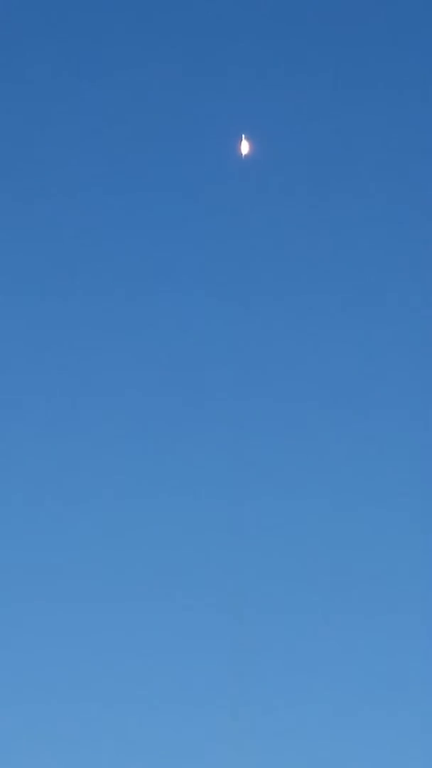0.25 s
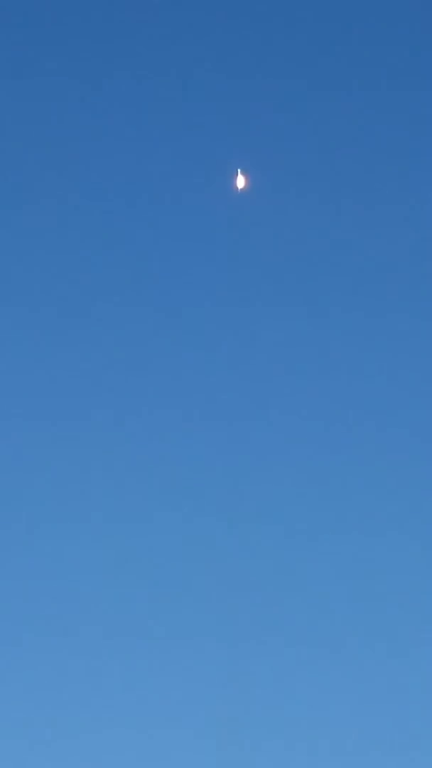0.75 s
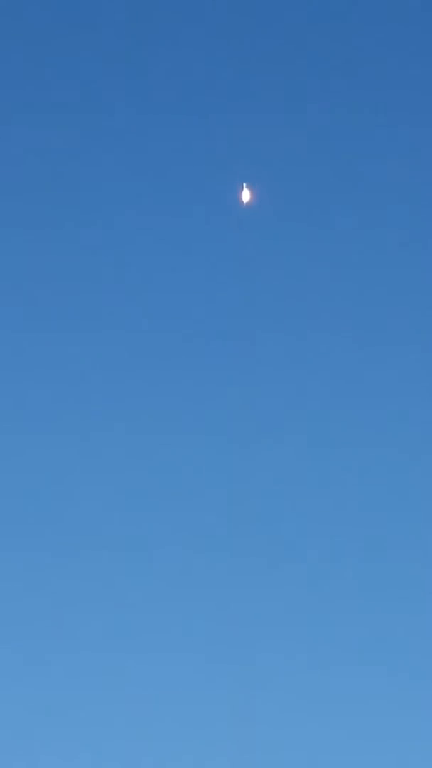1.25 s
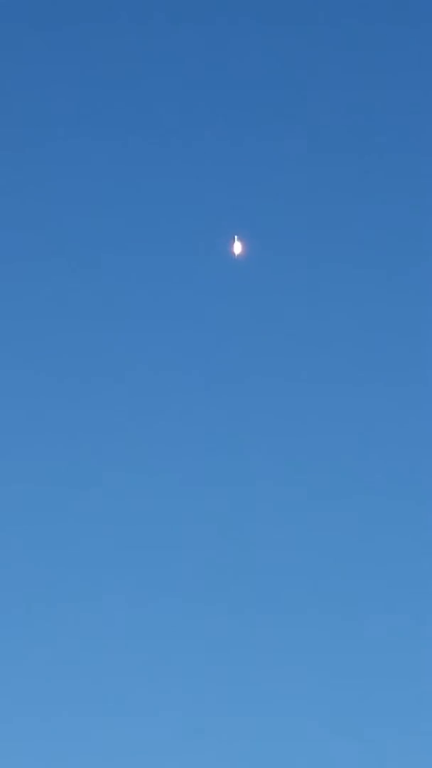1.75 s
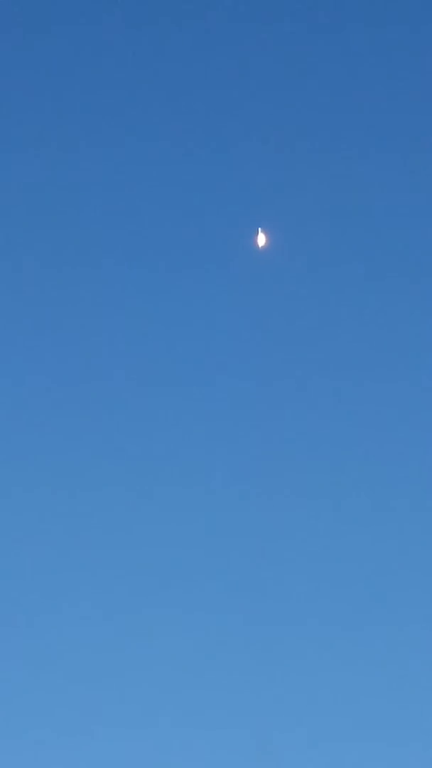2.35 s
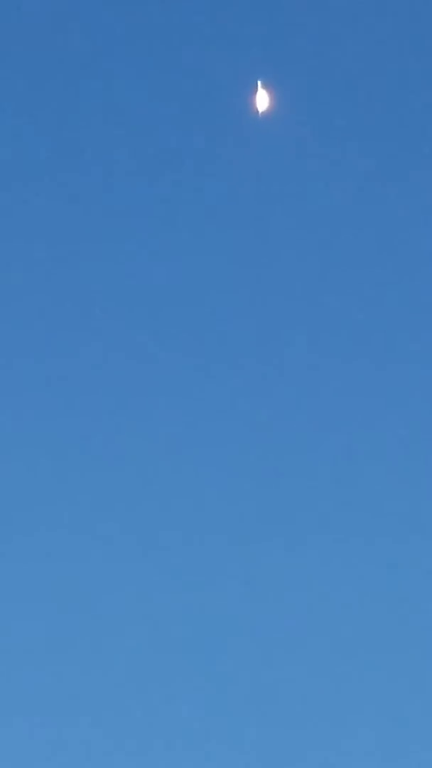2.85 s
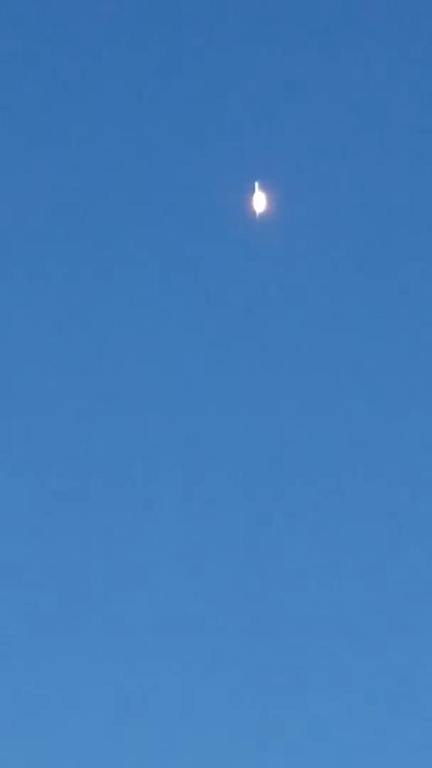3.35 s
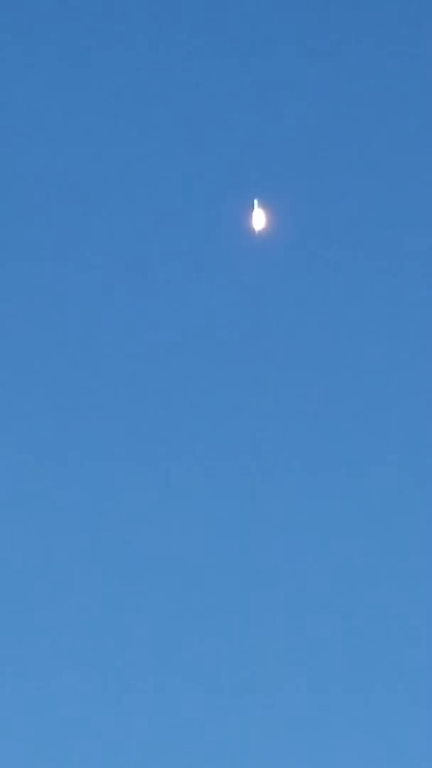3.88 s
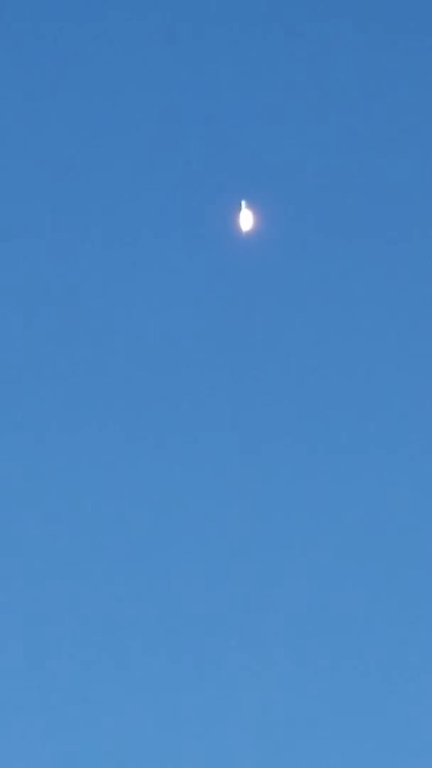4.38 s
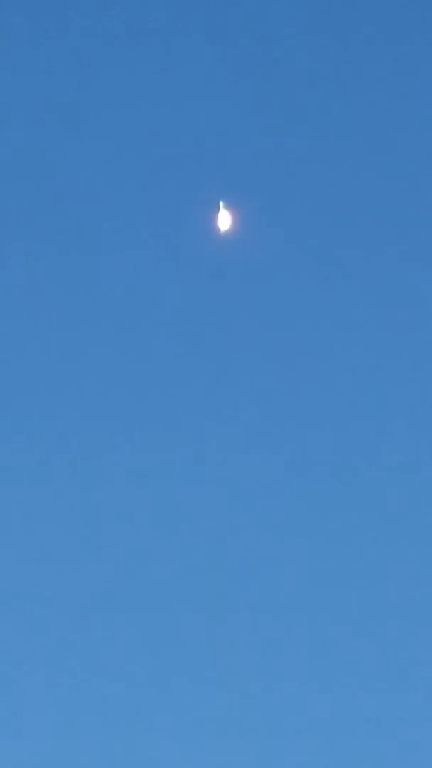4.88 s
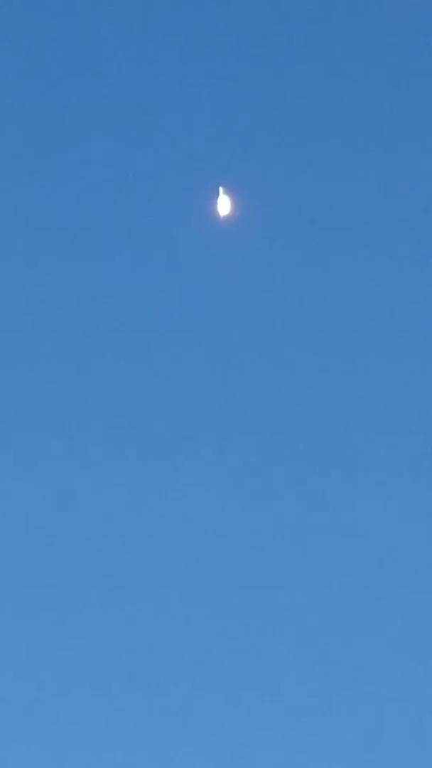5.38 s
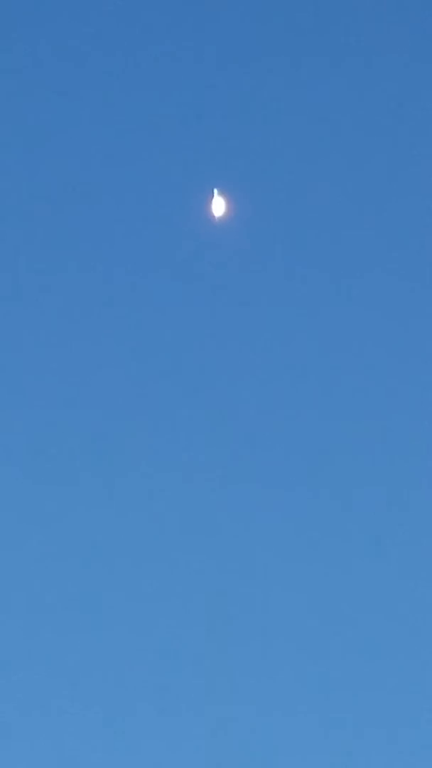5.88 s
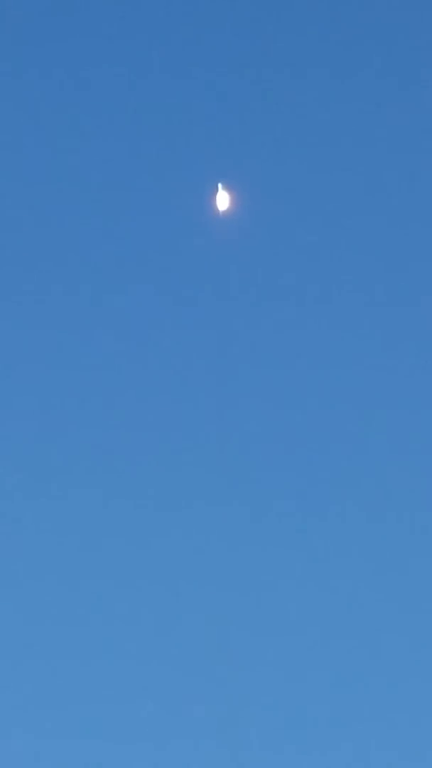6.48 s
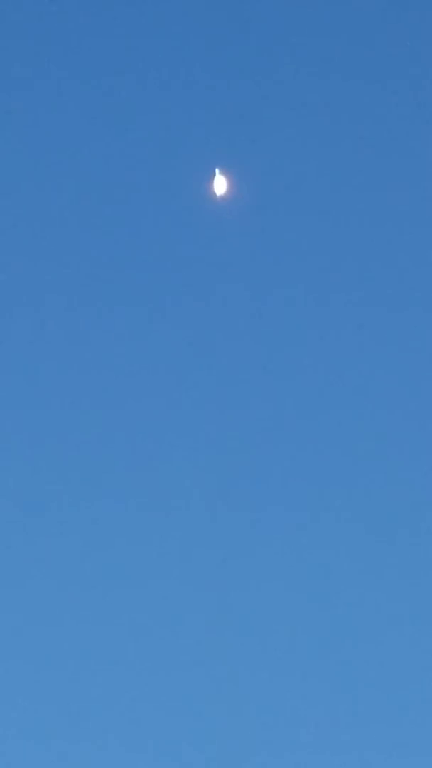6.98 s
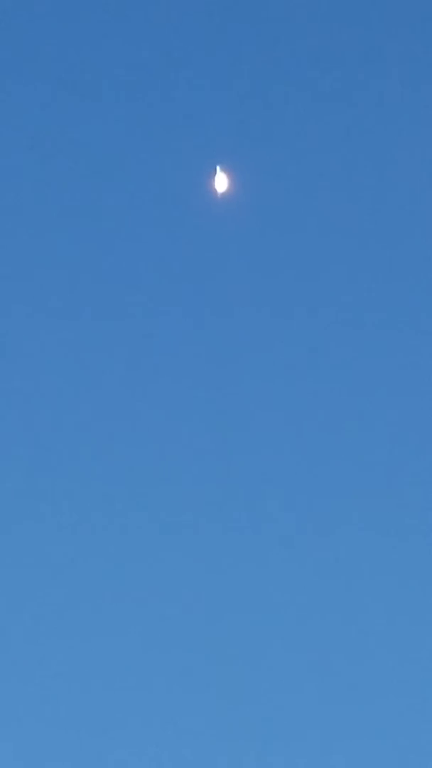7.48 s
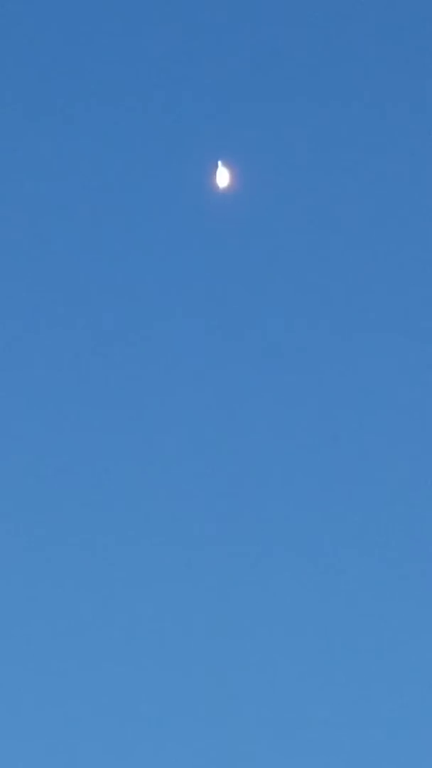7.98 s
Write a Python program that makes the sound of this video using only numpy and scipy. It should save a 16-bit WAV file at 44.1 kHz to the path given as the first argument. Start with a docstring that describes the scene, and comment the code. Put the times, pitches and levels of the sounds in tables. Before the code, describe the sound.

A rocket climbs far away in open air, already thundering from the start. Irregular, hard-edged cracks come many times a second over a dull throbbing roar and deep rumble. The crackle thickens and grows heaviest around four seconds, eases near five and a half, then swells again, duller and weightier. A handheld stereo recorder on the ground is pushed to its ceiling by the strongest cracks.

```python
"""A ragged crackle over a dull throbbing roar and faint hiss: a rocket climbing far overhead.
Its exhaust noise has steepened into shock fronts; each comes again off the ground and is scattered around.
Fronts are pressure jumps shaped by air loss and echo paths; roar and hiss are filtered, flickering noise.
Two microphone ports hear it a little apart, and the strongest fronts reach the recorder's ceiling."""
import sys
import numpy as np
from scipy import signal
from scipy.fft import rfft, irfft, next_fast_len
from scipy.io import wavfile
from scipy.ndimage import uniform_filter1d, minimum_filter1d, map_coordinates

SR = 44100
rng = np.random.default_rng(int(sys.argv[2]) if len(sys.argv) > 2 else 0)


def pcm_store(signal):
    """Save signal as 16-bit PCM."""
    levels = np.round(np.clip(np.atleast_2d(signal), -1, 1) * 32767)
    wavfile.write(sys.argv[1], SR, levels.astype(np.int16).T)


N = 363384

# Strong shock fronts. Each row: time in seconds, peak in dB ahead of the paths and FRONT_DB,
# air loss at 3 kHz in dB over LEAST_LOSS_DB.
STRONG_FRONTS = [(0.007, -7, 0.5), (0.029, -4, 33), (0.042, -4, 19.5), (0.0878, -10, 28), (0.122, -4.5, 14),
                 (0.1482, -6.5, 26), (0.1593, -1.5, 45), (0.1944, -1.5, 6.5), (0.2551, -3.5, 9.5),
                 (0.264, -6, 17), (0.344, 3.5, 0), (0.4062, -6.5, 24), (0.4489, -6.5, 31),
                 (0.494, -6, 10.5), (0.526, -3.5, 27), (0.557, -6, 9.5), (0.584, -2, 6.5),
                 (0.6129, -6.5, 19), (0.625, -7.5, 24.5), (0.656, -4.5, 30), (0.717, -4.5, 16.5),
                 (0.735, -6, 24), (0.761, -7, 19.5), (0.7919, -7.5, 19.5), (0.809, -7, 16.5),
                 (0.818, -10, 16), (0.8579, -4, 7), (0.8731, -5.5, 10.5), (0.888, -10, 15.5),
                 (0.937, -6, 30.5), (0.98, -5, 12.5), (1.028, -6.5, 27), (1.0705, -4.5, 23),
                 (1.096, -3, 31.5), (1.1549, -8, 31.5), (1.1588, -2.5, 27.5), (1.1863, -2.5, 13.5),
                 (1.2266, -2, 5.5), (1.2871, -4, 31), (1.297, -8, 20.5), (1.3069, -0.5, 4),
                 (1.3597, -5.5, 10.5), (1.3704, -4.5, 13.5), (1.4175, -0.5, 4), (1.434, -11, 13),
                 (1.4709, -4, 8.5), (1.5118, -3, 23), (1.5332, -5, 20.5), (1.5712, -1.5, 5),
                 (1.6016, -5, 15), (1.644, -2, 10.5), (1.687, 1.5, 0.5), (1.7056, -13.5, 6),
                 (1.726, -5, 6.5), (1.763, -4, 21.5), (1.783, -4.5, -1), (1.83, -6, 36.5), (1.875, -3, 5),
                 (1.918, -11, 33), (1.9452, -7, 15), (1.9829, -6.5, 31.5), (2.0226, -6, 10),
                 (2.079, -5.5, 10), (2.144, -5, 6), (2.174, -6.5, 12), (2.2447, -6, 25), (2.2889, -6.5, 25),
                 (2.3235, -3.5, 19.5), (2.3568, -4, 16.5), (2.4296, -3, 31.5), (2.485, -4.5, 9.5),
                 (2.558, -4, 19.5), (2.6047, -1, 7.5), (2.6785, -3.5, 18), (2.7, -6, 25),
                 (2.721, -7.5, 18.5), (2.754, -4.5, 55.5), (2.7764, -6, 22), (2.7823, -1.5, 25.5),
                 (2.82, -4.5, 35), (2.8376, -3.5, 7.5), (2.9, -5.5, 28), (2.9288, 3.5, 8),
                 (2.962, -6.5, 12.5), (2.9807, -4.5, 27.5), (3.014, -4.5, 34), (3.049, -1, 18.5),
                 (3.0842, -4.5, 32), (3.1135, -1, 21.5), (3.15, -4.5, 30.5), (3.1813, -4, 26.5),
                 (3.189, -6, 29), (3.2076, 3.5, 13), (3.242, -7, 17), (3.269, -3.5, 15), (3.285, -4.5, 20),
                 (3.346, -2, 18), (3.405, -4.5, 32.5), (3.436, -3, 3.5), (3.4555, -2, 14.5),
                 (3.4879, -3.5, 30), (3.5197, -1, 36), (3.574, 2, 6), (3.5862, -5, 22.5), (3.61, -2, 34),
                 (3.6384, -12, 29), (3.6451, 0, 16.5), (3.674, 0.5, 35), (3.745, -4.5, 29),
                 (3.7626, -3.5, 16.5), (3.785, 1, 24), (3.81, -1, 19), (3.828, 4, 22.5),
                 (3.852, -3.5, 29.5), (3.8707, 2.5, 39.5), (3.9045, -10, 31.5), (3.923, -6, 30),
                 (3.9333, -3.5, 11), (3.9529, -3, 24), (3.9894, -4, 39.5), (4.0133, -0.5, 43),
                 (4.033, 0.5, 37), (4.0586, -5.5, 9), (4.072, 4, 11.5), (4.111, -1, 12), (4.134, -4.5, 39),
                 (4.153, 0, 11.5), (4.1902, -3.5, 42), (4.221, 2.5, 6), (4.248, -3, 11),
                 (4.267, -7.5, 25.5), (4.277, -1, 8), (4.319, -0.5, 35), (4.35, -3.5, 10),
                 (4.3725, -7, 29.5), (4.405, 2, 3), (4.413, -2, 11), (4.4324, 2.5, 13.5), (4.471, -8.5, 20),
                 (4.484, -1.5, 26.5), (4.505, -0.5, 17), (4.5188, -7, 11), (4.538, -3.5, 5.5),
                 (4.551, -3, 28.5), (4.5684, -7, 35.5), (4.6, -3, 14), (4.6324, -2, 2.5), (4.6471, -2, 8.5),
                 (4.692, -0.5, 1), (4.735, -4, 5.5), (4.762, -5, 21), (4.792, -5, 26), (4.8282, -7.5, 19),
                 (4.8561, -3.5, 12), (4.8968, -4.5, 8.5), (4.914, -6.5, 27.5), (4.935, -7.5, 26.5),
                 (4.968, -7, 20), (5.004, -4.5, 15.5), (5.014, -5, 18), (5.0612, -4.5, 40), (5.074, -5, 16),
                 (5.1407, -3.5, 0.5), (5.159, -5.5, 16), (5.2148, -5, 17), (5.247, -6, 2.5),
                 (5.317, -6, 34.5), (5.348, -6, 32), (5.374, -5.5, 8), (5.4104, -6, 27), (5.448, -12, 21.5),
                 (5.463, -4, 11), (5.511, -11, 29), (5.548, -4, 26), (5.639, -5, 42), (5.753, -8.5, 32.5),
                 (5.826, -6.5, 49), (5.871, -8.5, 27.5), (5.9563, -5, 23.5), (6.035, -5.5, 48),
                 (6.061, -5.5, 38.5), (6.127, -4.5, 16), (6.198, -7, 34), (6.2148, -5, 18.5),
                 (6.283, -5, 31.5), (6.301, -7, 44.5), (6.318, -5.5, 39), (6.3508, -5.5, 33),
                 (6.382, -6.5, 30), (6.396, -2.5, 42.5), (6.4222, -4.5, 39.5), (6.455, -0.5, 20.5),
                 (6.4888, -10.5, 29), (6.495, -4.5, 28.5), (6.5128, -3, 16.5), (6.576, 1, 56),
                 (6.618, -4.5, 38), (6.659, -9.5, 33.5), (6.7139, -3.5, 34.5), (6.7252, -3.5, 38.5),
                 (6.7661, -6, 35.5), (6.7813, 2, 33), (6.839, 1.5, 41), (6.869, 1, 34.5), (6.926, -2.5, 49),
                 (6.9726, -2, 35), (7.0309, -2.5, 36), (7.0477, -10, 30), (7.0652, -1, 21),
                 (7.1008, -2, 38.5), (7.13, -1, 24), (7.171, -2.5, 21.5), (7.193, -0.5, 25.5),
                 (7.2362, -0.5, 34), (7.283, -1, 27), (7.2944, -3.5, 34), (7.308, -9, 33), (7.32, 2, 19.5),
                 (7.362, -2, 28.5), (7.4001, -4, 33.5), (7.4123, -2.5, 30), (7.42, -5, 40),
                 (7.434, -2.5, 24), (7.485, 1.5, 37), (7.564, 1.5, 13), (7.5965, -4, 31.5),
                 (7.6564, 2.5, 15.5), (7.679, -1, 29), (7.7376, -6, 31), (7.7493, -8.5, 31.5),
                 (7.7659, 0.5, 22), (7.801, -4.5, 33), (7.815, 1, 28.5), (7.831, 1.5, 42),
                 (7.8532, -8.5, 36), (7.8774, 4.5, 26), (7.891, -3, 36.5), (7.937, -0.5, 39.5),
                 (7.961, -3.5, 27), (7.9785, 0, 3), (8.014, -6.5, 17), (8.0354, -4, 37),
                 (8.066, -3.5, 21.5), (8.0979, -9, 17.5), (8.116, -1, 11.5), (8.143, -7, 21.5),
                 (8.1666, -2, 18.5), (8.184, -2, 10), (8.217, -3.5, 14.5)]
# Paths shift as the rocket climbs and the recorder turns. Each row: time in seconds, ground echo delay
# in ms left, right, its level in dB left, right, strength of the trough behind a front 0-1, left over right in dB.
GROUND_PATHS = [(0, 3.25, 3.07, -13, -3.5, 0.6, -2.5), (1.2, 3.54, 3.276, -6.5, -1, 0.2, -2),
                (2.5, 3.7, 3.464, -4, -0.5, .7, -2), (3.302, 4.2, 3.777, -8.5, -2.5, 0.9, -1),
                (4.202, 4.1, 3.716, -10.5, -2.5, 0.6, 0), (5.201, 4.09, 3.73, -6.5, 1, 0.4, -0.5),
                (6.3, 4.7, 3.85, -3, -1, .75, -2.3), (7.2, 4.7, 3.92, -9.5, -8, 0.7, -1.1),
                (8.24, 4.43, 3.97, -11, -6.5, 0.3, -2)]
# Weaker echoes of nearby things. Each row: delay in ms, level in dB left, right at the start,
# left, right halfway, left, right at the end.
NEAR_ECHOES = [(1.3, -15.5, -13, -22.5, -8, -15, -10), (5.2, -33.5, -11.5, -29.5, -7, -24, -10.5),
               (7.2, -17.5, -19, -16, -13, -11, -11.5), (10.3, -11, -16.5, -17, -15.5, -12.5, -17),
               (13.5, -19.5, -19.5, -19.5, -24, -16.5, -21.5)]
# Roar bands that come and go, and the bite of the fronts. Each row: time in seconds, heavy band in dB,
# firm band in dB, bite near BITE_HZ in dB.
BAND_LEVELS = [(0, -45, -43, -1), (1.2, -42.5, -40.5, 2), (2.3, -39, -58, 2), (2.8, -32.5, -39.5, -4),
               (3.5, -27.5, -33.5, 3.5), (3.9, -22.5, -42, 2), (4.2, -28, -44.5, 8), (4.45, -36.5, -45, -1),
               (4.9, -41, -37, 0.5), (5.8, -38.5, -47.5, 3.5), (6.4, -28, -36, -7), (7.2, -32.5, -46, 3),
               (8.24, -35, -45.5, -1)]
# Scattered tail. Each row: frequency in Hz, t60 in seconds, strength in dB.
SCATTER_TAIL = [(100, 0.24, -3.5), (513, 0.75, 2), (2000, 0.14, 2), (8000, 0.072, 0.5)]
# Roar levels. Each row: time in seconds, roar in dB, deep rumble in dB, upper roar in dB.
ROAR_LEVELS = [(0, -25.5, -19, -38.5), (0.18, -28, -26.5, -44.5), (0.4, -30.5, -26.5, -45.5),
               (0.8, -37.5, -26, -50.5), (1.2, -29.5, -24.5, -53.5), (1.8, -30.5, -26.5, -56),
               (2.55, -31.5, -25, -48.5), (3.1, -31, -20.5, -47.5), (3.9, -25, -24.5, -49),
               (4.45, -33, -28, -47.5), (4.75, -32.5, -28.5, -50), (5.3, -34, -28.5, -48.5),
               (5.85, -36.5, -31, -55.5), (6.3, -27.5, -20.5, -49.5), (6.75, -26.5, -18, -46),
               (7.3, -27, -22, -53.5), (7.75, -28, -21.5, -45.5), (8.24, -28, -25, -52)]
# Noise spectra, relative. Each row: frequency in Hz, density in dB per Hz.
BODY_SPECTRUM = [(60, -43), (100, -14.5), (160, -24.5), (210, -14.5), (280, -1), (340, -5), (400, -4),
                 (550, -15.5), (860, -23.5), (960, -19), (1600, -33.5), (2500, -57.5), (5000, -120)]
FIZZ_SPECTRUM = [(700, -33.5), (1200, -3), (2000, -8.5), (2900, -14), (3400, -22), (3800, -24.5),
                 (4500, -30), (6000, -58.5), (9000, -120)]  # upper roar
DEEP_SPECTRUM = [(11, -41.5), (18, -16.5), (59, -1), (113, -9), (174, -12), (200, -9.5), (260, -21.5),
                 (440, -120)]
HEAVY_SPECTRUM = [(120, -40.5), (175, 0), (230, 0), (310, -0.5), (360, -26), (600, -120)]
FIRM_SPECTRUM = [(400, -120), (640, -27.5), (720, -6), (850, 5), (910, -22), (1300, -120)]
HISS_SPECTRUM = [(2500, -37), (4000, 5.5), (6000, 4), (9000, 0.5), (13000, 1.5), (15600, 4.5), (16000, -25)]
SPRAY_SPECTRUM = [(800, -30), (1500, -5.5), (3000, -3), (5000, -18), (8000, -23.5), (12000, -26),
                  (15500, -28), (16000, -45.5)]  # tearing hiss
# Hiss level. Each row: time in seconds, level in dB.
HISS_LEVELS = [(0, -64.5), (0.6, -67.5), (1.2, -74), (1.6, -73.5), (2.25, -76), (2.75, -71.5), (4.45, -68),
               (5.1, -70.5), (5.7, -78.5), (6.05, -76), (6.35, -67.5), (7.5, -69), (7.7, -67.5),
               (8.24, -73)]
# Tearing hiss behind the sharpest fronts. Each row: start in seconds, level in dB, hold in seconds.
TEAR_BURSTS = [(0.007, -51.5, .03), (0.194, -51.5, 0.022), (0.256, -54, .03), (0.344, -41, 0.039),
               (0.585, -53.5, 0.027), (0.856, -50, 0.017), (1.226, -50, .02), (1.307, -44, 0.051),
               (1.418, -45.5, 0.016), (1.472, -50.5, 0.023), (1.572, -46, 0.016), (1.685, -41, .02),
               (1.783, -47.5, 0.015), (1.875, -54, 0.012), (2.144, -44.5, 0.0078), (2.605, -47.5, 0.022),
               (2.929, -48.5, 0.02), (3.574, -51, 0.018), (4.22, -47, 0.013), (4.405, -41, 0.037),
               (4.539, -58, 0.015), (4.632, -44.5, 0.011), (4.693, -47.5, 0.037), (5.141, -45, 0.024),
               (5.462, -55, 0.025), (7.563, -50, 0.035), (7.656, -55, .06), (7.977, -50.5, 0.032)]
# Tiny dry treble ticks. Each row: time in seconds, impulse level in dB ahead of the filter.
TICK_TIMES = [(3.4376, -29.5), (3.649, -20.5), (5.247, -25.5), (6.419, -27), (6.4973, -38), (6.5778, -26),
              (7.4874, -32), (7.564, -19.5)]
# Colour of the ports. Each row: frequency in Hz, left in dB, right in dB.
PORT_COLOUR = [(100, -0.5, 4), (316, 3.5, 2), (830, 0.5, 0.5), (840, 1, -4), (1680, -0.5, 0), (1990, 3, 4),
               (2290, 3.5, -5.5), (2340, 3.5, 1), (2660, 2.5, 6), (4560, -1.5, -5), (6040, -2.5, -1.5),
               (9000, -4, -0.5), (16000, -5, -6.5)]

LAG_MS = 0.17  # the left port hears the sky later
LEAST_LOSS_DB = 4
FRONT_DB = 2  # brings the front's shape up to its peak
SAG_MS = 0.45
BITE_HZ, BITE_WIDE_HZ = 2120, 434
GROUND_HZ = 2770  # echoes lose treble above this
REPEAT_DB, REPEAT_HZ = -9, 800  # repeated ground bounces: level a bounce, treble edge
SHADE_DB_PER_LOSS_DB, SHADE_HZ = 0.5, 2260  # rounded fronts: extra treble loss on the direct path
OPENS_DB_PER_LOSS_DB = 0.16  # rise of the ground echo's treble edge for rounded fronts
PATTER_DB, PATTER_SPREAD_DB = 8.5, 4  # weak fronts: least peak over the roar, spread above it
SCATTER_DB, SCATTER_HOLD_S = -16, 0.0096  # level, time before the tail starts to die
TEAR_T60_S = 0.36
TOP_HZ = 16600


def amp(db):
    """dB to gain."""
    return 10 ** (np.asarray(db) / 20)


def unit(x):
    """Scaled to rms 1."""
    return x / np.sqrt(np.mean(x ** 2) + 1e-20)


def along(points_hz, values, hz):
    """Values interpolated on a log frequency axis."""
    return np.interp(np.log(hz + 1), np.log(np.asarray(points_hz) + 1), values)


def curves(rows):
    """One value per sample for each column after the time."""
    at_s, *columns = np.transpose(rows)
    return [np.interp(np.arange(N) / SR, at_s, c) for c in columns]


def wobble(rate_hz):
    """A smooth random curve with rate_hz knots a second."""
    knots = rng.standard_normal(int(N * rate_hz / SR) + 4)
    return map_coordinates(knots, [np.arange(N) * rate_hz / SR])


def filtered(x, response):
    """x times a complex response of frequency."""
    size = next_fast_len(N + SR // 2)
    return irfft(rfft(x, size) * response(np.fft.rfftfreq(size, 1 / SR)), size)[..., :N]


def noise(spectrum, shared, flicker_db, lag_ms=LAG_MS):
    """Flickering stereo noise of rms 1; the shared part reaches the left port lag_ms later."""
    common, own = rng.standard_normal(N), rng.standard_normal((2, N))
    lag = lambda hz: np.exp(-2j * np.pi * np.outer([lag_ms / 1000, 0], hz))
    pair = np.sqrt(shared) * filtered(common, lag) + np.sqrt(1 - shared) * own
    at_hz, db = np.transpose(spectrum)
    return unit(amp(flicker_db) * filtered(pair, lambda hz: amp(along(at_hz, db, hz))))


def crackle():
    """Strong fronts, with a random patter of weak, rounder ones that come in clumps."""
    strong = fronts(*np.transpose(STRONG_FRONTS))
    when, size, dull = rng.random((420, 3)).T
    when_s = when * N / SR
    roar_db = np.interp(when_s, *np.transpose(ROAR_LEVELS)[:2])
    clump_db = 3 * np.minimum(wobble(20)[(when_s * SR).astype(int)], 1)
    peak_db = roar_db + PATTER_DB + PATTER_SPREAD_DB * size + clump_db
    return strong + fronts(when_s, peak_db, 25 + 18 * dull)


def fronts(times_s, peak_db, loss_db):
    """Shock fronts at both ports: pressure sags, jumps up and decays, then the echoes follow."""
    size, ahead, count = 1536, 256, len(times_s)  # window and lead in samples
    hz = np.fft.rfftfreq(size, 1 / SR)
    jw = 2j * np.pi * hz / 1000  # per ms
    vary = lambda *shape: rng.standard_normal((*shape, count))
    late = lambda ms: np.exp(-jw * np.asarray(ms)[..., None])
    swell = lambda ms, wide_ms: wide_ms * np.exp(-jw * ms + (jw * wide_ms) ** 2 / 2)
    at_s, *controls = np.transpose(GROUND_PATHS)
    left_ms, right_ms, left_db, right_db, trough, pan_db = [np.interp(times_s, at_s, c) for c in controls]

    # pressure shape: a rise, the sag, the jump and decay, a trough behind
    fall_ms = (np.array([[0.75], [0.45]]) * amp(1.1 * vary()))[..., None]
    jump = fall_ms / (1 + jw * fall_ms) - 0.99 * SAG_MS / (1 - jw * SAG_MS)
    rise = 0.026 * swell(-2.0, 0.94)
    dip = (trough * amp(0.38 * vary()))[:, None] * swell(0.67 * right_ms[:, None], 0.8)
    pulse = jump + rise - dip

    # air absorption rounds the front: loss grows with frequency, then levels off
    air = amp(-(loss_db[:, None] + LEAST_LOSS_DB) * np.minimum(hz / 3000, 2.4) ** 1.242)
    bite_db = np.interp(times_s, *np.transpose(BAND_LEVELS)[[0, -1]]) + 2.1 * vary()
    bite_hz = BITE_HZ * amp(0.6 * vary())[:, None]
    bite = amp(bite_db[:, None] * np.exp(-((hz - bite_hz) / BITE_WIDE_HZ) ** 2 / 2))

    # direct path, then the repeating ground echo
    loss = np.clip(loss_db, 0, 24)[:, None]
    direct = amp(-SHADE_DB_PER_LOSS_DB * loss * np.clip((hz - SHADE_HZ) / 900, 0, 1))
    ground_ms = np.array([left_ms, right_ms]) + 0.12 * vary()
    ground_db = np.array([left_db, right_db]) + 3.2 * vary(2)
    edge_hz = GROUND_HZ * amp(OPENS_DB_PER_LOSS_DB * loss)
    again = amp(REPEAT_DB) * late(ground_ms[1]) / (1 + 1j * hz / REPEAT_HZ) ** 2
    ground = amp(ground_db)[..., None] * late(ground_ms) / (1 + 1j * hz / edge_hz) ** 2
    paths = direct + ground / (1 - again)

    dulled = 1 / (1 + 1j * hz / GROUND_HZ) ** 2
    for ms, *db in NEAR_ECHOES:
        stir = vary(2)  # turbulence shifts every path anew
        sides_db = np.reshape(db, (-1, 2)).T
        near_db = [np.interp(times_s, [0, N / SR / 2, N / SR], side) for side in sides_db]
        near_ms = ms * (1 + 0.03 * stir[::-1])
        paths += amp(near_db + 2.5 * stir)[..., None] * dulled * late(near_ms)

    pan = amp([pan_db / 2, -pan_db / 2])[..., None]
    port = late([[LAG_MS], [0]]) * late(ahead / SR * 1000) * pan
    shapes = irfft(pulse * air * bite * paths * port, size) * SR / 1000
    shapes = shapes * amp(peak_db + FRONT_DB)[:, None]
    at = np.round(times_s * SR).astype(int)[:, None] + np.arange(size)
    return np.array([np.bincount(at.ravel(), s.ravel(), N + 2 * size)[ahead:][:N] for s in shapes])


def scattered(x):
    """The surroundings answer with a tail that dies faster in the treble and changes as the source moves."""
    step, delay = SR // 4, 250  # samples
    at_hz, t60_s, db = np.transpose(SCATTER_TAIL)
    x, out = np.pad(x, ((0, 0), (step, 2 * step))), np.zeros((2, N + 2 * SR))
    for start in range(0, N + step, step):
        common, *own = rng.standard_normal((3, SR // 2))
        hz, t, grains = signal.stft(common + 0.5 * np.array(own), SR, nperseg=256)
        decay_s = along(at_hz, t60_s, hz)[:, None]
        colour_db = along(at_hz, db, hz)[:, None]
        grit_db = 3 * rng.standard_normal(len(t))  # separate scatterers make it ragged
        fall_db = 60 * np.maximum(t - SCATTER_HOLD_S, 0) / decay_s
        tail = signal.istft(grains * amp(grit_db + colour_db - fall_db), SR, nperseg=256)[1]
        piece = x[:, start:start + 2 * step] * np.hanning(2 * step)
        part = signal.fftconvolve(piece, tail / np.linalg.norm(tail[0]), axes=1)
        out[:, start + delay:][:, :part.shape[1]] += part
    return out[:, step:][:, :N]


def roar():
    """Unsteepened exhaust noise: a throbbing body, two bands that swell, a fainter, brighter top, a deep rumble."""
    roar_db, deep_db, fizz_db = curves(ROAR_LEVELS)
    heavy_db, firm_db, _ = curves(BAND_LEVELS)
    throb = wobble(24)
    body_noise = noise(BODY_SPECTRUM, shared=1.0, flicker_db=3.0 * throb)
    body = amp(roar_db) * unit(off_ground(body_noise, share=0.23))
    fizz = amp(fizz_db) * noise(FIZZ_SPECTRUM, shared=0.079, flicker_db=1.3 * throb)
    deep = amp(deep_db) * noise(DEEP_SPECTRUM, shared=0.9, flicker_db=0.2 * throb)
    heavy = amp(heavy_db) * noise(HEAVY_SPECTRUM, shared=0.92, flicker_db=1.5 * throb)
    firm = amp(firm_db) * noise(FIRM_SPECTRUM, shared=1.0, flicker_db=3.9 * throb)
    return body + fizz + deep + heavy + firm


def off_ground(x, share):
    """x with its echo off the ground, whose delay drifts."""
    left_ms, right_ms, *_ = curves(GROUND_PATHS)
    at = np.arange(N)
    echo = [np.interp(at - ms * SR / 1000, at, side) for ms, side in zip((left_ms, right_ms), x)]
    return x + share * np.array(echo)


def hiss():
    """Faint noise above the roar, with a diffuse spray that dies after the sharpest fronts."""
    t = np.arange(N) / SR
    flare = np.zeros(N)
    for start_s, db, hold_s in TEAR_BURSTS:
        fall_db = 60 * np.maximum(t - start_s - hold_s, 0) / TEAR_T60_S
        flare += (t >= start_s) * amp(db - fall_db)
    steady_flicker_db = 1.1 * wobble(14) + 1.8 * wobble(60)
    spray_flicker_db = 3.5 * wobble(300) + 3 * wobble(60)
    steady = noise(HISS_SPECTRUM, shared=0.19, flicker_db=steady_flicker_db, lag_ms=0)
    spray = noise(SPRAY_SPECTRUM, shared=0.25, flicker_db=spray_flicker_db, lag_ms=0)
    return amp(curves(HISS_LEVELS)[0]) * steady + flare * spray


def ticks():
    """Single sharp clicks without a body: impulses through a high-pass and a gentle low-pass."""
    clicks = np.zeros(N)
    at_s, db = np.transpose(TICK_TIMES)
    clicks[np.round(at_s * SR).astype(int)] = amp(db)
    sharp = lambda hz: (1j * hz / (1800 + 1j * hz)) ** 2 / (1 + 1j * hz / 7000)
    return amp([[0.5], [-0.5]]) * filtered(clicks, sharp)


def scene():
    """Crackle, its scattered tail, roar, hiss and ticks."""
    shocks = crackle()
    return shocks + amp(SCATTER_DB) * scattered(shocks) + roar() + hiss() + ticks()


def record(dry):
    """Port colour and bass roll-off, a limiter that holds peaks near full scale, then the band limit."""
    bass_hz = np.array([[30], [95]])  # left, right
    at_hz, *sides_db = np.transpose(PORT_COLOUR)
    colour = lambda hz: amp([along(at_hz, db, hz) for db in sides_db])
    x = filtered(dry, lambda hz: colour(hz) * (1j * hz / (bass_hz + 1j * hz)) ** 2)
    needed = np.minimum(1, 0.97 / (np.abs(x).max(axis=0) + 1e-9))
    gain = uniform_filter1d(minimum_filter1d(needed, size=161), size=121)  # fast, same for both ports
    x = np.clip(1.025 * x * gain, -1, 1)
    return filtered(x, lambda hz: hz < TOP_HZ)


dry = scene()
out = record(dry)
pcm_store(out)
```